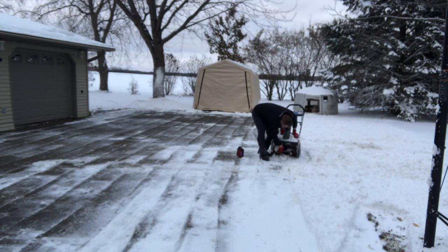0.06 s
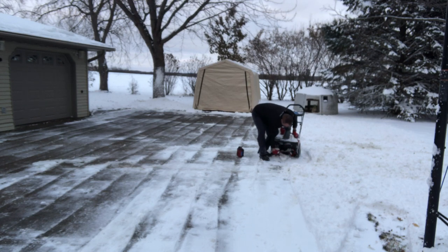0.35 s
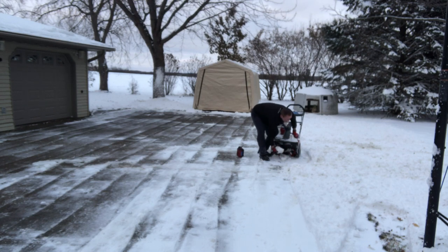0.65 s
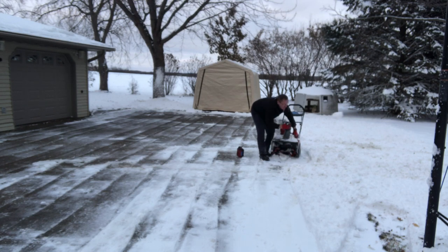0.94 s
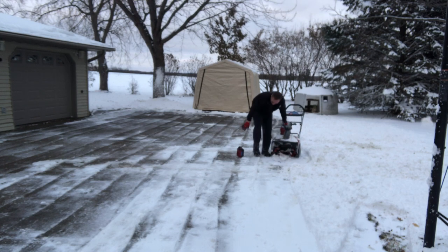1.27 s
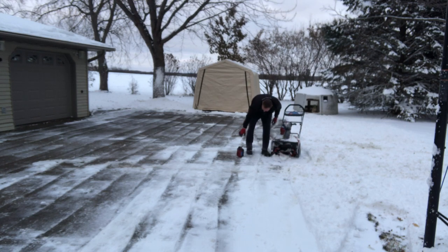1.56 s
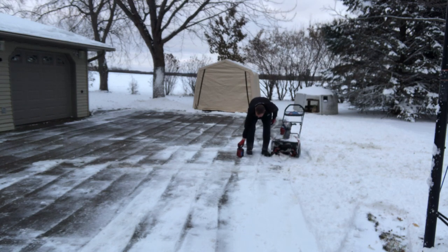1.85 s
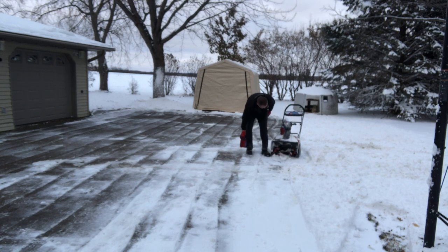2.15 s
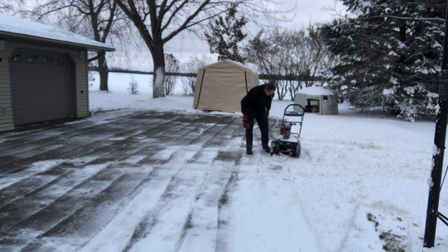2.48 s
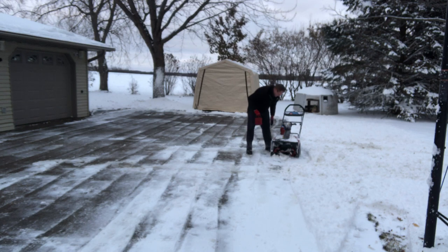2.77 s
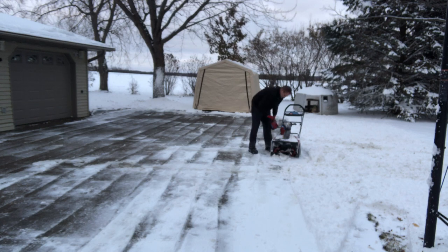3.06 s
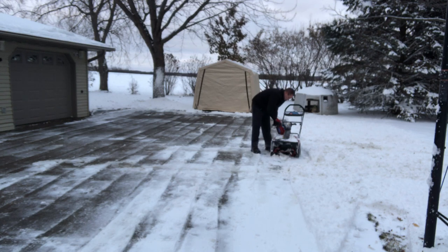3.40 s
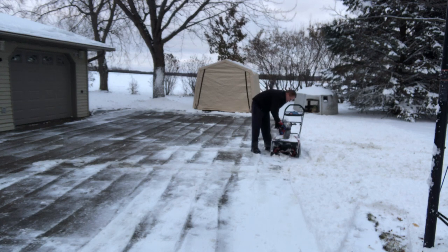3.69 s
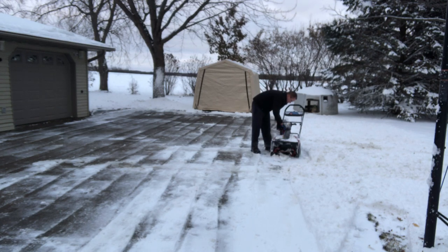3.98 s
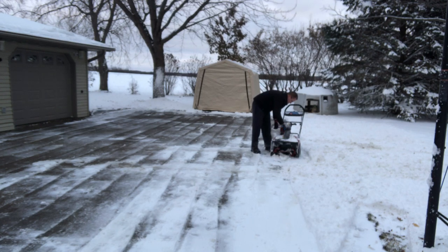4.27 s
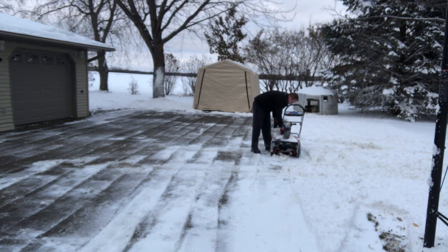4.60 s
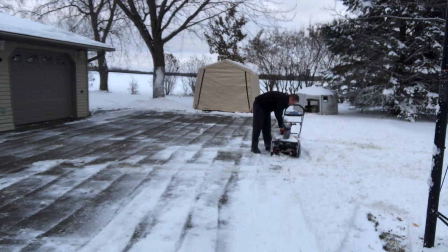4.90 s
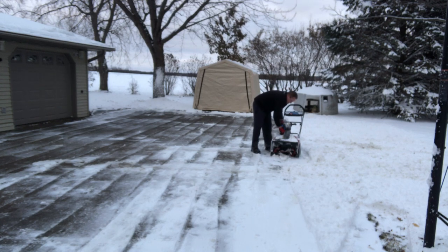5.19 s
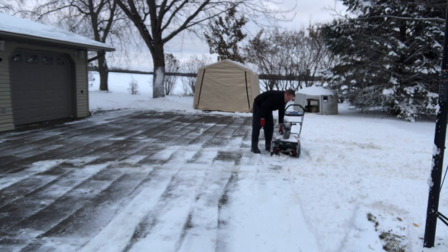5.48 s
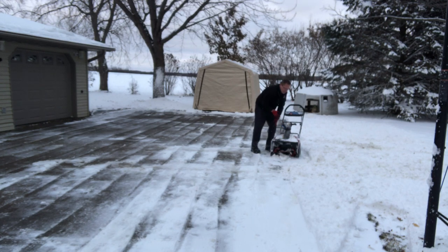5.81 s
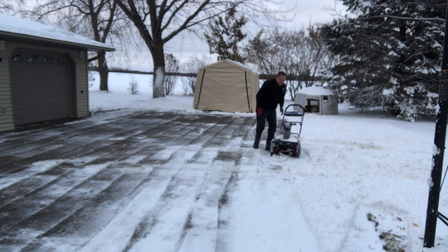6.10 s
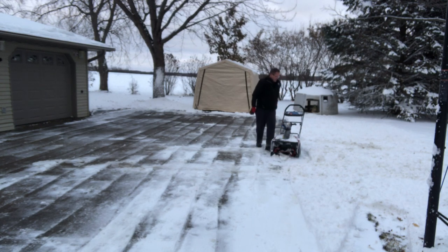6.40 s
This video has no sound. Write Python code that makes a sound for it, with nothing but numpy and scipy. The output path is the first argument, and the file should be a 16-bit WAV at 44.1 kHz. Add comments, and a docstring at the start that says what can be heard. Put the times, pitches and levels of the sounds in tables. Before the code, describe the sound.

Gloves and jacket rub up close as wet snow crunches out of a snow blower, with sharp clacks near the end.

```python
"""Clearing a snow blower by hand

Outdoors, very close to a switched-off snow blower packed with wet snow. Jacket, sleeves and gloves
rub and swish right by the microphone, with a few thin squeaks and ticking ice crumbs. Snow gives way
under hand or boot in dull crunches. Near the end hard parts clack together and overload the
microphone, which picks up little treble."""
import sys
import numpy as np
from scipy import signal
from scipy.fft import rfft, irfft, next_fast_len
from scipy.io import wavfile
from scipy.ndimage import uniform_filter1d

SR = 44100
rng = np.random.default_rng(int(sys.argv[2]) if len(sys.argv) > 2 else 0)


def master_out(mix):
    """Clip the mix to full scale and print it as 16-bit PCM to the path in sys.argv[1]."""
    frames = np.transpose(np.atleast_2d(mix))
    ceiling = np.clip(frames, -1, 1)
    pcm = np.round(ceiling * 32767).astype(np.int16)
    wavfile.write(sys.argv[1], SR, pcm)


N = 293265

# Noise colours. Each row: frequency in Hz, relative spectral level in dB.
AIR_SPECTRUM = [(30, -31), (100, -11), (300, 2.5), (600, -8.5), (1500, -9), (3300, -19), (6000, -16.5),
                (8000, -37.5)]   # still outdoor air
TICK_SPECTRUM = [(300, -24), (1000, -10.5), (2500, -4.5), (3400, -2.5), (4500, 2), (6000, -2.5),
                 (7000, -10), (8000, -39.5)]   # ice crumbs on the glove
RUSTLE_SPECTRUM = [(25, -27), (70, -20), (120, -9.5), (220, -5), (500, 3), (700, 1.5), (900, -9),
                   (1400, -45)]   # rubbing, low band
RASP_SPECTRUM = [(500, -29.5), (800, -3), (1080, -1.5), (1400, -5), (1850, -6), (2200, -10), (2700, -11),
                 (3300, -20.5), (4500, -28.5)]   # rubbing, middle band
HISS_SPECTRUM = [(2000, -40), (3300, -27), (3800, -13.5), (4100, -6.5), (4700, -7.5), (5400, -0.5),
                 (5900, -0.5), (6400, -0.5), (7000, -12), (7600, -23), (8200, -44.5)]   # rubbing, high band; also icy grit
# Resonances. Each row: frequency in Hz, relative level in dB, time to fall 60 dB in seconds.
HOUSING_MODES = [(201, -1.5, 0.047), (276, -9.5, 0.079), (339.6, -8.5, 0.1), (394, -8, 0.068),
                 (465.7, -5, 0.058), (571, -2.5, 0.035), (694, 0, 0.021)]   # the low thud of the snow-packed housing
PANEL_MODES = [(994, -2.5, 0.028), (1128, -3.5, 0.024), (1236, -2, 0.0083), (1563, -4.5, .018),
               (1638, -4.5, 0.02), (1765, -3.5, 0.018), (1900, -4.5, 0.01), (2320, -5.5, 0.012),
               (2740, -8, 0.0063)]   # the ring of its walls
CONTACT_MODES = [(3880, -12.5, 0.006), (4670, -11.5, 0.006), (5160, -5, 0.0088), (5860, -3.5, 0.021),
                 (6440, -6, 0.011)]   # the bright snap of hard parts
# Faint squeaks. Each row: loudest moment, rise and fall in seconds, pitch in Hz, level in dB.
THIN_SQUEAKS = [(0.465, 0.023, .03, 1920, -53), (1.975, 0.023, 0.091, 2450, -63.5),
                (2.044, 0.1, .3, 1844, -63.5), (6.384, 0.083, 0.073, 1755, -46)]
# Clothing rubs. Each row: fastest moment, rise and fall in seconds, rustle, rasp and hiss in dB.
RUBBING_STROKES = [(0.044, 0.057, 0.04, -68, -74, -57.5), (0.22, 0.13, 0.25, -65, -63, -61.5),
                   (0.37, 0.15, 0.17, -55.5, -69, -78), (0.465, 0.071, 0.049, -51, -52.5, -54),
                   (0.55, .09, 0.046, -51, -49.5, -41), (0.674, .12, 0.15, -43.5, -44, -35.5),
                   (0.941, 0.48, 0.067, -53, -58, -58.5), (1.059, 0.11, 0.14, -43, -52.5, -57.5),
                   (1.139, 0.11, .26, -48.5, -51, -44.5), (1.312, 0.042, .025, -40.5, -46, -39),
                   (1.39, 0.073, 0.12, -59.5, -60, -53.5), (1.63, 0.16, 0.29, -60, -63, -59),
                   (2.252, 0.063, 0.082, -41, -30, -50), (2.292, 0.081, 0.1, -40.5, -40, -20.5),
                   (2.541, 0.21, 0.071, -37.5, -39.5, -29), (2.78, 0.22, 0.39, -59.5, -58.5, -50.5),
                   (2.955, 0.094, 0.11, -40.5, -46.5, -43), (3.259, 0.087, 0.075, -45.5, -58, -67),
                   (3.45, 0.57, 0.29, -60.5, -59, -64), (4.2, 0.093, 0.19, -58.5, -66, -68),
                   (4.355, 0.073, .045, -70, -58.5, -52.5), (4.51, 0.049, 0.087, -33, -41.5, -43.5),
                   (4.76, 0.19, .13, -29.5, -40.5, -44.5), (5.042, 0.035, 0.027, -44.5, -50, -58.5),
                   (5.145, 0.079, 0.051, -32.5, -37.5, -43.5), (5.292, 0.12, 0.062, -50, -47.5, -50.5),
                   (5.561, 0.21, 0.36, -47.5, -45.5, -45.5), (5.929, 0.11, 0.14, -44.5, -39.5, -50.5),
                   (6.128, 0.063, 0.068, -43.5, -42, -55), (6.39, 0.18, 0.28, -59, -54.5, -57.5),
                   (6.557, 0.029, 0.12, -51.5, -33.5, -38), (6.613, .05, 0.056, -39, -33.5, -35)]
# The hand leans on packed snow. Each row: start and hold in seconds, level in dB.
HAND_SQUEEZES = [(3.821, 0.24, -32), (4.085, 0.032, -28.5), (4.466, 0.15, -32), (4.699, 0.12, -29.5),
                 (4.887, 0.035, -38.5)]
# Snow crunches. Each row: start and length in seconds, thud, ring and grit in dB, thud centre in Hz.
SNOW_CRUNCHES = [(0.335, 0.013, -48.5, -55.5, -80, 600), (0.947, 0.0056, -41, -65, -52, 226),
                 (1.012, 0.0085, -34, -46.5, -47.5, 428), (1.57, 0.0069, -40.5, -51, -54, 360),
                 (1.605, 0.025, -40, -46, -55.5, 460), (1.634, 0.011, -36.5, -39, -53, 450),
                 (2.3, 0.0081, -26.5, -58, -28, 480), (2.744, 0.041, -49, -64, -70, 273),
                 (3.249, 0.025, -32, -42.5, -71, 573), (3.267, 0.042, -35.5, -41, -75, 540),
                 (3.805, 0.031, -31, -42, -52, 360), (3.819, 0.018, -23.5, -42, -66, 390),
                 (3.855, 0.012, -28.5, -38, -56, 484), (3.88, .016, -23, -31, -48, 284),
                 (3.899, 0.011, -25, -42, -46, 306), (3.924, 0.019, -26.5, -37.5, -52.5, 430),
                 (3.964, 0.0055, -25.5, -21.5, -37.5, 410), (3.984, 0.024, -22.5, -36, -45, 440),
                 (4.035, 0.014, -27, -37, -47, 520), (4.083, 0.025, -24, -37, -48.5, 400),
                 (4.118, 0.013, -31.5, -37, -50, 390), (4.45, 0.0081, -23.5, -42, -51, 420),
                 (4.488, 0.0078, -27.5, -31, -40.5, 390), (4.544, 0.0088, -25.5, -34.5, -46, 440),
                 (4.627, .012, -33, -39.5, -44, 299), (4.685, 0.0083, -28, -30, -31.5, 650),
                 (4.703, 0.0064, -50, -21, -28, 390), (4.746, 0.014, -28, -22, -27.5, 310),
                 (4.786, 0.014, -34, -31.5, -36, 490), (4.813, .012, -32, -46, -50.5, 350),
                 (4.896, 0.018, -32.5, -41, -55, 610), (5.086, 0.016, -34, -27, -41, 620),
                 (5.603, 0.017, -27, -54, -61, 520), (6.219, 0.024, -42.5, -55, -82, 600),
                 (6.249, 0.0034, -37.5, -58, -72, 600)]
# Parts hit. Each row: start and length in seconds, thud, wall ring and snap in dB, thud centre in Hz.
HARD_CONTACTS = [(5.1017, .0055, -18.5, -11, -9.7, 620), (5.1068, .004, -11, -17, -21, 430),
                 (5.5573, .008, -17.5, -16, -22, 620), (5.5665, .007, -5, -10.5, -16, 450),
                 (5.5749, .004, -6.5, -16.5, -22, 340), (5.856, .002, -26, -24, -28, 700),
                 (5.8585, .003, -10.5, -16, -22, 680)]


def from_db(db):
    """Decibels to gain."""
    return 10 ** (np.asarray(db) / 20)


def rms_one(x):
    """Scale to rms 1."""
    return x / np.sqrt(np.mean(x ** 2) + 1e-20)


def colour(x, spectrum):
    """Filter by a smooth spectrum."""
    hz, db = np.transpose(spectrum)
    size = next_fast_len(len(x) + SR // 10)
    bins = np.maximum(np.fft.rfftfreq(size, 1 / SR), 1)
    gain = from_db(np.interp(np.log(bins), np.log(hz), db))
    return irfft(rfft(x, size) * gain, size)[:len(x)]


def band(x, low_hz, high_hz):
    """Band-pass with gentle slopes."""
    return signal.sosfilt(signal.butter(2, [low_hz, high_hz], "band", fs=SR, output="sos"), x)


def drift(per_s):
    """A random wander of rms 1 that turns `per_s` times a second."""
    knots = rng.standard_normal(4096)
    return rms_one(np.interp(np.arange(N) / SR * per_s, np.arange(len(knots)), knots))


def grains(per_s, spread_db):
    """Random clicks of uneven size and sign."""
    sizes = from_db(spread_db * np.minimum(rng.exponential(1, N), 4)) * rng.choice([-1, 1], N)
    return sizes * (rng.random(N) < per_s / SR) + 1e-18


def swell(peak_s, rise_s, fall_s, edge_db=-18.5, roundness=1.864):
    """Gain of a movement that speeds up and slows: 1 at its peak, edge_db one rise or fall away."""
    t = np.arange(N) / SR - peak_s
    away = np.minimum(np.abs(t) / np.where(t < 0, rise_s, fall_s), 3)
    return from_db(edge_db * away ** roundness)


def burst(length_s, tail_db, tail_s):
    """A quick run of tiny cracks, then a weaker trickle."""
    t = np.arange(SR // 4) / SR
    run = 1 / (1 + (t / length_s) ** 10)
    return rng.standard_normal(len(t)) * (run + from_db(tail_db) * np.exp(-t / tail_s))


def ring(clicks, modes, gains=1):
    """Clicks set decaying sines going; neighbouring modes swing in opposite directions."""
    out = 0
    for k, ((hz, db, t60), gain) in enumerate(zip(modes, gains * np.ones(len(modes)))):
        radius, angle = from_db(-60 / (t60 * SR)), 2 * np.pi * hz / SR
        mode = signal.lfilter([1, -1], [1, -2 * radius * np.cos(angle), radius * radius], clicks)
        out = out + (-1) ** k * gain * from_db(db) * mode
    return out


def strike(clicks, modes, centre_hz, db_per_octave, chance_db):
    """Ring the modes; the place of contact favours those near one pitch."""
    octaves = np.abs(np.log2(np.array(modes)[:, 0] / centre_hz))
    gains = from_db(chance_db * rng.standard_normal(len(modes)) - db_per_octave * octaves)
    return ring(clicks, modes, gains)


def add(out, sound, start_s, length_s, db):
    """Mix in a sound so that its loudest stretch of length_s has the given level."""
    loudest = uniform_filter1d(sound ** 2, int(length_s * SR) + 1).max()
    start = int(start_s * SR)
    out[start:start + len(sound)] += (from_db(db) * sound / np.sqrt(loudest))[:N - start]


def still_air(level_db=-64):
    """Faint, steady outdoor air behind the machine."""
    return from_db(level_db) * rms_one(colour(rng.standard_normal(N), AIR_SPECTRUM))


def squeaks(width_hz=130):
    """Narrow, unsteady tones swell and fade."""
    out = 0
    for peak_s, rise_s, fall_s, hz, db in THIN_SQUEAKS:
        tone = band(rng.standard_normal(N), hz - width_hz / 2, hz + width_hz / 2)
        out = out + from_db(db) * swell(peak_s, rise_s, fall_s) * rms_one(tone)
    return out


def crumbs(hiss_db):
    """Ice crumbs tick on the glove; they show in light rubbing and drown in the hiss of hard rubbing."""
    ticks = rms_one(colour(grains(170, spread_db=2), TICK_SPECTRUM))
    return from_db(np.minimum(hiss_db - 7, .5 * hiss_db - 34.5)) * ticks


def rubbing_levels():
    """Rustle, rasp and hiss in dB over time, summed over all strokes."""
    power = np.full((3, N), 1e-12)
    for peak_s, rise_s, fall_s, *levels_db in RUBBING_STROKES:
        power += np.outer(from_db(levels_db) ** 2, swell(peak_s, rise_s, fall_s) ** 2)
    return 10 * np.log10(power)


def swishes(rustle_db, rasp_db, hiss_db):
    """Jacket, sleeves and gloves rub and swish right by the microphone: a dense stream of tiny slips."""
    grip_db = 1.1 * drift(70)   # the grip wavers, in all bands together
    rustle_gain = from_db(rustle_db + grip_db + 1.5 * drift(45))
    rustle = rms_one(colour(grains(700, spread_db=-2), RUSTLE_SPECTRUM))
    rasp_gain = from_db(rasp_db + grip_db + 0.57 * drift(60))
    rasp = rms_one(colour(grains(3000, spread_db=1.5), RASP_SPECTRUM))
    hiss_gain = from_db(hiss_db + 1.1 * grip_db)
    hiss = rms_one(colour(grains(14000, spread_db=4), HISS_SPECTRUM))
    return rustle_gain * rustle + rasp_gain * rasp + hiss_gain * hiss


def hand_pressure(attack_s=.012, release_db_per_s=331.5, surge_db=2.5):
    """Gain of the squeezes: each sets in quickly, holds and lets go."""
    t, out = np.arange(N) / SR, 0
    for start_s, hold_s, db in HAND_SQUEEZES:
        attack = np.clip((t - start_s) / attack_s, 0, 1)
        released_s = np.maximum(t - start_s - hold_s, 0)
        out = out + attack * from_db(db - release_db_per_s * released_s)
    return out * from_db(surge_db * drift(40))   # the snow yields unevenly


def packing_snow():
    """Pressed snow sticks and slips; the clumped fractures drum on the housing."""
    slips = grains(600, spread_db=1.5) * from_db(2.7 * drift(110))
    thud = rms_one(band(ring(slips, HOUSING_MODES), low_hz=109, high_hz=830))
    wall = rms_one(band(ring(slips, PANEL_MODES), low_hz=700, high_hz=2200))
    ticks = rms_one(colour(slips, TICK_SPECTRUM))
    body = thud + from_db(-16) * wall + from_db(-28.5) * ticks
    steady = body / np.sqrt(uniform_filter1d(body ** 2, SR // 30) + 1e-9)
    return hand_pressure() * steady   # the hand's force sets the loudness


def crunches():
    """Snow crunches under hand or boot: a short burst with a dull thud, ring and grit."""
    out = np.zeros(N)
    for start_s, length_s, thud_db, ring_db, grit_db, thud_hz in SNOW_CRUNCHES:
        ring_hz = 1200 * 2 ** ((ring_db + 37) / 46.5)   # harder blows ring higher
        cracks = burst(length_s, tail_db=-4, tail_s=0.02)
        cracks[0] += 12   # the first crack is the sharpest
        thud = strike(cracks, HOUSING_MODES, thud_hz, db_per_octave=13, chance_db=4.5)
        ringing = strike(cracks, PANEL_MODES, ring_hz, db_per_octave=12.5, chance_db=5.5)
        icy = rng.random(len(cracks)) < .06   # a few fractures are icy and bright
        grit = colour(cracks * icy, HISS_SPECTRUM)
        add(out, band(thud, low_hz=129, high_hz=895), start_s, length_s, thud_db)
        add(out, band(ringing, low_hz=607, high_hz=2.37 * ring_hz), start_s, length_s, ring_db)
        add(out, grit, start_s, length_s, grit_db)
    return out


def clacks():
    """Hard parts chatter together for a few milliseconds, with a faint, deep thump underneath."""
    out = np.zeros(N)
    for start_s, length_s, thud_db, wall_db, snap_db, thud_hz in HARD_CONTACTS:
        chatter = burst(length_s, tail_db=-8, tail_s=0.0085)
        blow = chatter.copy()
        blow[0] += 70   # the first impact sets the housing booming
        thud = strike(blow, HOUSING_MODES, thud_hz, db_per_octave=12, chance_db=5)
        wall = strike(chatter, PANEL_MODES, centre_hz=1200, db_per_octave=5.5, chance_db=0.5)
        low_thump = band(blow, low_hz=15, high_hz=85)
        snap = ring(chatter, CONTACT_MODES)
        bare_crack = band(chatter, low_hz=2240, high_hz=5400)
        add(out, thud, start_s, length_s, thud_db)
        add(out, low_thump, start_s, length_s, thud_db - 34.5)
        add(out, wall, start_s, length_s, wall_db)
        add(out, snap, start_s, length_s, snap_db)
        add(out, bare_crack, start_s, length_s, snap_db - 9.5)
    return out


def scene():
    """Close up at the housing, in mono; the snow all round soaks up every echo."""
    air = still_air()
    rustle_db, rasp_db, hiss_db = rubbing_levels()
    clothing = swishes(rustle_db, rasp_db, hiss_db) + crumbs(hiss_db)
    return (air + clothing + packing_snow() + crunches() + clacks() + squeaks())[None]


def record(dry, microphone_top_hz=7320, cutoff_hz=16000):
    """The microphone passes little treble; the clacks clip and splash above its range, up to a cutoff."""
    narrow = signal.sosfilt(signal.cheby1(10, .3, microphone_top_hz, fs=SR, output="sos"), dry)
    clipped = np.clip(narrow, -1, 1)
    return signal.sosfilt(signal.ellip(10, .1, 80, cutoff_hz, fs=SR, output="sos"), clipped)


dry = scene()
out = record(dry)
master_out(out)
```